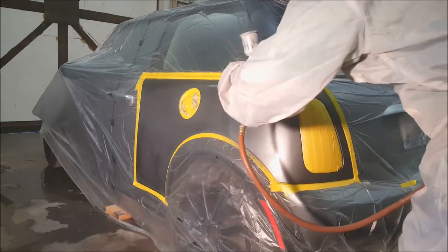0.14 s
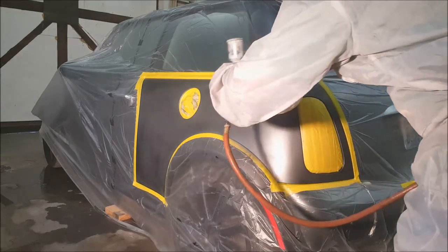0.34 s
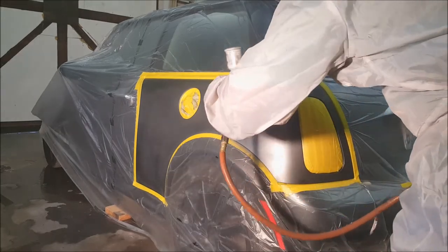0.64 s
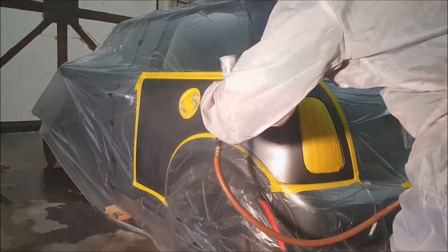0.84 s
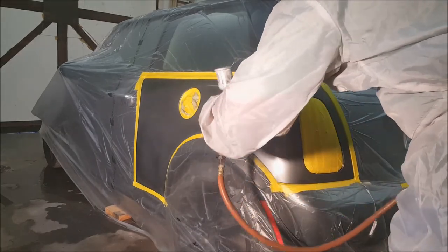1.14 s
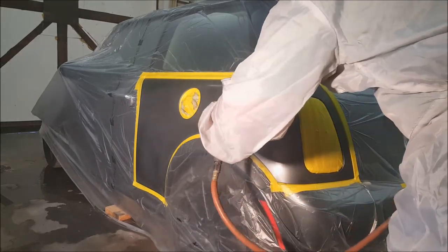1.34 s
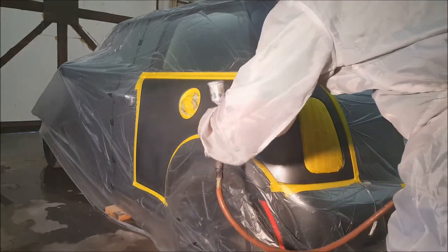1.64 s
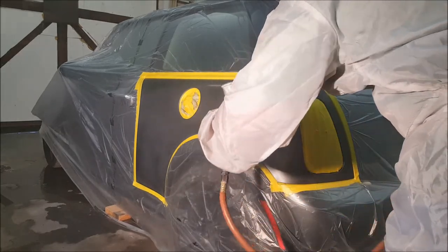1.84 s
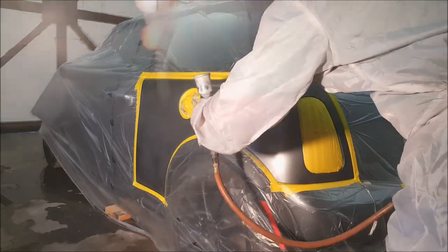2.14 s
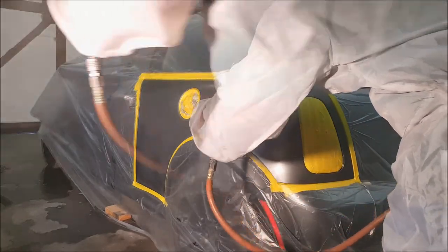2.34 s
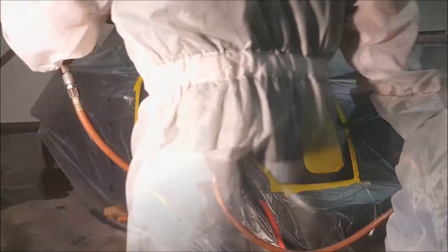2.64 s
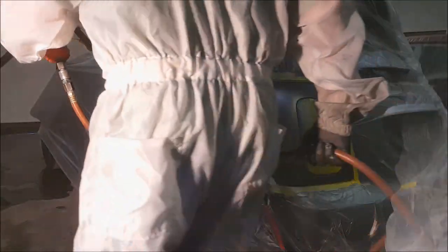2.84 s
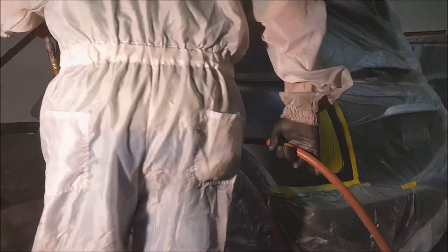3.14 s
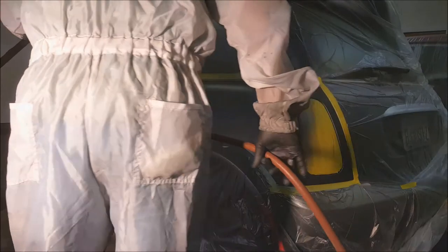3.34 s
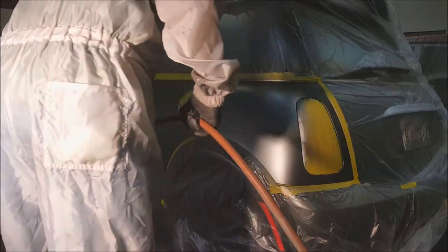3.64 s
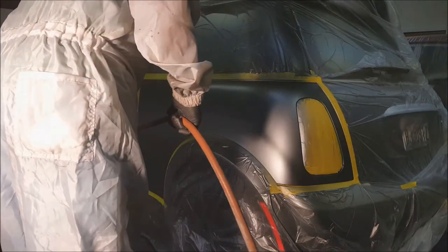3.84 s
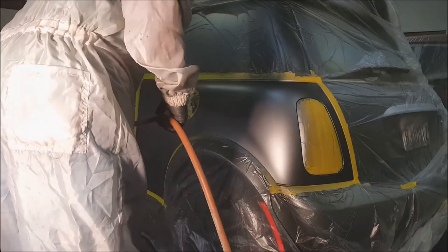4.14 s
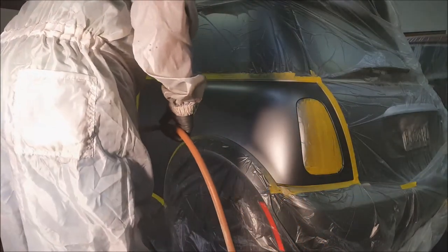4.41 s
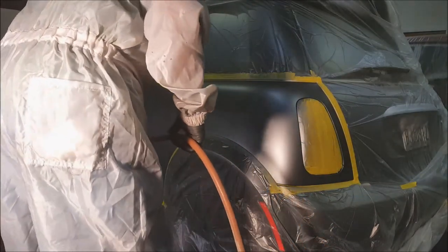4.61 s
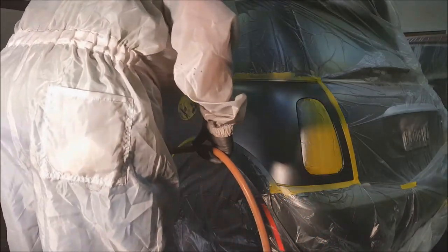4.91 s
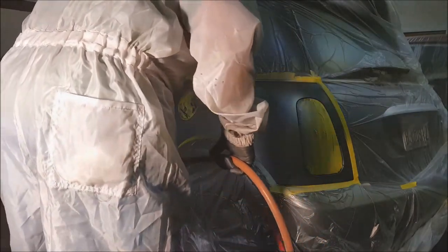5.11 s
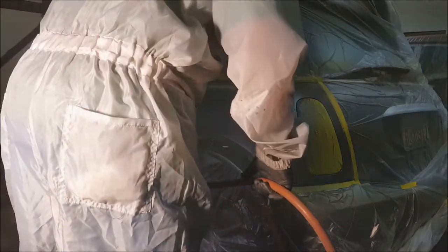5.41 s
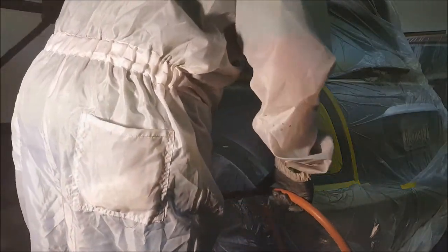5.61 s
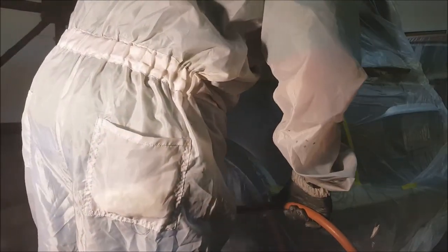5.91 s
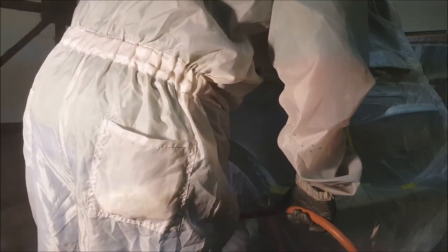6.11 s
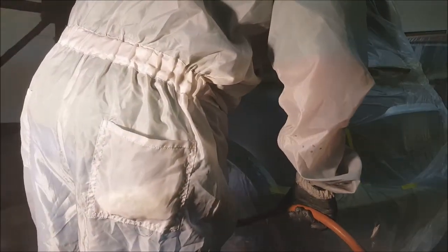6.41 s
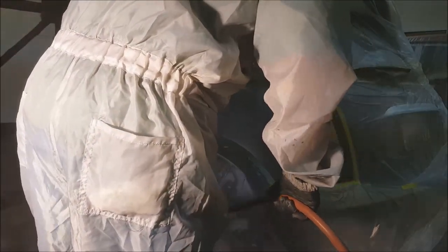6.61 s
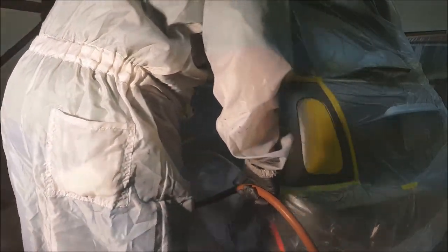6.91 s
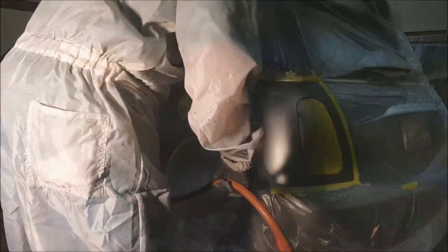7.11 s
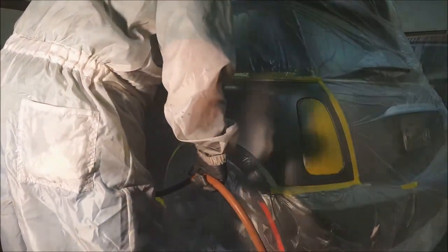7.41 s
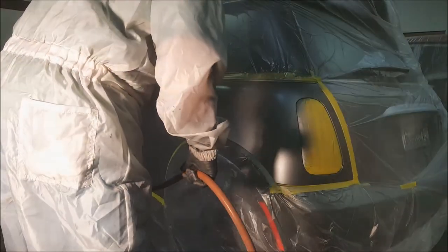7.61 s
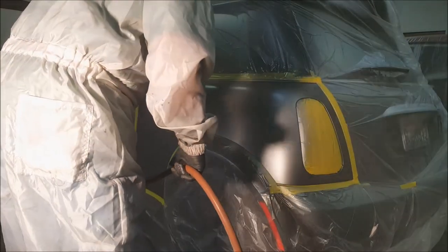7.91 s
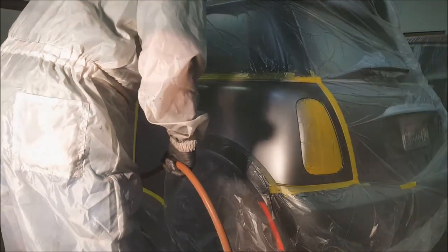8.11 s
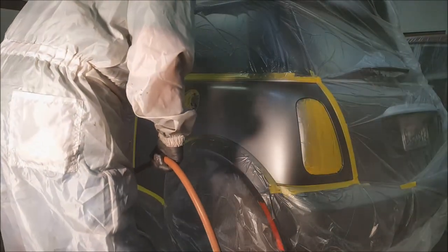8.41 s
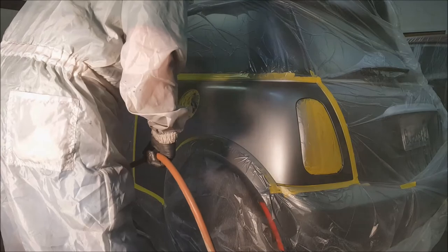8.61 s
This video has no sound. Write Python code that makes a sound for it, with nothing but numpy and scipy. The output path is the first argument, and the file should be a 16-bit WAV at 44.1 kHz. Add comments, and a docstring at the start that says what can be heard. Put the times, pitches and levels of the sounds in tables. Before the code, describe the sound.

Steady paint spraying hiss with a thin high whistle and one abrupt pause, soft bumps, and a motor starting near the end.

```python
"""In a closed workshop a spray gun hisses: its air jet sizzles, roars on the panel being sprayed and whistles
at the air cap on the nozzle. The trigger is pulled and eased; the hiss cuts off abruptly once, leaving the
quiet shop. The hose and feet bump softly, the gun's valve thumps deeply once, and late on a motor starts with a
low groan and settles into a hum with a thin whine."""
import sys
import numpy as np
from scipy import signal
from scipy.fft import rfft, irfft, next_fast_len
from scipy.io import wavfile
from scipy.ndimage import uniform_filter1d, map_coordinates

SR = 44100
rng = np.random.default_rng(int(sys.argv[2]) if len(sys.argv) > 2 else 0)


def log_audio(samples):
    """Write samples as a 16-bit WAV file to the path given in sys.argv[1]."""
    # one column per channel
    frames = np.atleast_2d(samples).T
    # limit to full scale, then quantise
    limited = np.clip(frames, -1, 1)
    pcm = np.round(limited * 32767).astype(np.int16)
    wavfile.write(sys.argv[1], SR, pcm)


N = 385875

# a hollow ring while the jet is close to the panel: time_s, band_db, note_db, note_hz
HOLLOW_RING = [(4.3, -60, -55, 925), (4.6, -42, -52, 937), (5.5, -40, -55, 903), (6.4, -43, -46, 929),
               (7.1, -40, -47, 935), (7.6, -40.5, -42.5, 933), (8.1, -36.5, -45, 940),
               (8.25, -39.5, -56, 945), (8.75, -37.5, -56, 950)]


def amp(db):
    """Turn decibels into a gain to multiply by."""
    return 10 ** (np.asarray(db) / 20)


def unit(x):
    """Scale x to an average strength (rms) of 1."""
    return x / np.sqrt(np.mean(np.abs(x) ** 2) + 1e-20)


def along(points, hz):
    """Read between (pitch_hz, value) points, with octaves evenly spaced."""
    pitches, values = np.transpose(points)
    return np.interp(np.log(hz + 1), np.log(pitches + 1), values)


def curves(rows):
    """Join rows of (time_s, values...) with straight lines: one curve per value column."""
    times, *columns = np.transpose(rows)
    return [np.interp(np.arange(N) / SR, times, column) for column in columns]


def during(rows, fade_s):
    """1 from the first row's time to the last, fading to 0 outside."""
    start, end = rows[0][0], rows[-1][0]
    return curves([(start - fade_s, 0), (start, 1), (end, 1), (end + fade_s, 0)])[0]


def humps(rows):
    """Add up smooth hills given as (time_s, height, half_width_s)."""
    t = np.arange(N) / SR
    return sum(height * np.exp(-.5 * ((t - s) / half) ** 2) for s, height, half in rows)


def wobble(rate):
    """A smooth curve through `rate` random values a second."""
    knots = rng.standard_normal(int(N * rate / SR) + 4)
    coarse = np.arange(0, N + 64, 64)
    return np.interp(np.arange(N), coarse, map_coordinates(knots, [coarse * rate / SR]))


def filtered(x, response):
    """Multiply each frequency in x by the gain response(hz)."""
    size = next_fast_len(N + SR // 4)
    return irfft(rfft(x, size) * response(np.fft.rfftfreq(size, 1 / SR)), size)[..., :N]


def rush(spectrum, patchy_db):
    """Stereo noise shaped by a spectrum, with random louder and softer patches."""
    # how alike left and right are (1 = the same): pitch_hz, likeness
    alike = [(60, 0.37), (180, 0.76), (550, 0.42), (1650, 0.17), (4970, 0.069), (15000, 0.021)]

    def mid_and_side(hz):
        """Gains for the part both sides share and the part that sets them apart."""
        turn = np.arccos(np.clip(along(alike, hz), -1, 1)) / 2
        return amp(along([(9.3, -120)] + spectrum, hz)) * [np.cos(turn), np.sin(turn)]

    grid = signal.stft(rng.standard_normal((2, N)), nperseg=512)[2]
    patches = uniform_filter1d(rng.standard_normal(grid.shape[1:]), size=8, axis=0)  # smooth in pitch
    patches = uniform_filter1d(patches, size=14, axis=1)  # and in time
    noise = signal.istft(grid * amp(patchy_db * unit(patches)), nperseg=512)[1][:, :N]
    mid, side = filtered(noise, mid_and_side)
    return np.array([mid + side, mid - side]) / np.std(mid)


def tone(hz, waver_hz, flutter_db, rate, apart):
    """An unsteady note; the walls give each side its own phase and strength, as far as `apart` says."""
    phase = 2 * np.pi * np.cumsum(hz + waver_hz * wobble(rate)) / SR
    shared = wobble(rate)
    sides = []
    for _ in "LR":
        strength = amp(flutter_db * (shared + apart * wobble(rate)))
        sides.append(strength * np.sin(phase + apart * wobble(6)))
    return np.sqrt(2) * np.array(sides)


def shop_air():
    """The quiet, even background noise of the workshop."""
    # its tone colour: pitch_hz, level_db
    spectrum = [(15, -49), (25, -17), (33, -27), (70, -10.5), (108, -17.5), (127, -4.5), (161, -12),
                (195, -5), (223, -11), (384, -11.5), (476, -10), (1040, -14.5), (8360, -15.5), (10100, -22),
                (16000, -18)]
    return amp(-55) * rush(spectrum, patchy_db=0.3)


def bumps():
    """Soft knocks of hose and feet, and one deep thump of the gun's valve: a low thud that dies quickly, with a
    puff of dull noise."""
    # each knock: start_s, level_db, pitch_hz, ring_s (time to fade by 60 dB)
    knocks = [(1.369, -39, 110, .05), (2.018, -35, 150, .05), (2.203, -21.5, 270, .023),
              (2.477, -20, 320, 0.019), (2.739, -39, 161, 0.053), (3.304, -43, 150, .04),
              (3.402, -45, 190, .04), (3.74, -46, 50, .1), (3.868, -29, 250, 0.025),
              (5.375, -37, 159, 0.15)]
    sound, t = np.zeros(N + SR), np.arange(SR // 4) / SR
    dull = signal.butter(2, [70, 500], "bp", fs=SR, output="sos")
    attack = 1 - np.exp(-t / 0.0016)
    for start_s, level_db, pitch_hz, ring_s in knocks:
        puff = signal.sosfilt(dull, rng.standard_normal(len(t)))
        thud = np.sin(2 * np.pi * pitch_hz * t) + 0.36 * unit(puff)
        sound[round(start_s * SR):][:len(t)] += amp(level_db - 60 * t / ring_s) * attack * thud
    return sound[:N]


def motor():
    """A motor groans as it picks up load, then hums at twice the mains frequency and whines."""
    # the motor starting up: time_s, groan_db, hum_db, rumble_db
    levels = [(7.1, -79, -76, -66), (7.22, -56, -56, -46), (7.28, -42.5, -46, -42),
              (7.374, -37.5, -41, -45), (7.47, -43, -46, -45), (7.52, -54, -48, -41.5),
              (7.63, -60, -47, -48), (7.68, -57, -40.5, -46), (7.93, -56, -44.5, -46),
              (8.12, -51, -51, -43), (8.27, -54, -47, -47.5), (8.75, -49, -49, -44.5)]
    # the rumble's tone colour: pitch_hz, level_db
    rumble_spectrum = [(15, -48), (25, -13), (113, -5), (146, -5), (298, -11), (380, -5.5), (450, -23),
                       (580, -41), (990, -120)]
    # weaker notes in the whine: pitch_hz, level_db (relative to its main note)
    side_notes = [(484.5, -8), (1066, -8)]
    groan_hz, hum_hz, whine_hz = 67, 119, 695
    groan_db, hum_db, rumble_db = curves(levels)
    sound = amp(groan_db) * tone(groan_hz, waver_hz=3.0, flutter_db=1.8, rate=10, apart=.2)
    sound += amp(hum_db) * tone(hum_hz, waver_hz=3.26, flutter_db=1.0, rate=20, apart=0.21)
    sound += amp(rumble_db) * rush(rumble_spectrum, patchy_db=0.5)
    up_to_speed = curves([(7.9, 0.12), (8.15, 0.95)])[0]
    whine_gain = up_to_speed * amp(-43 + humps([(8.376, -15, .02)]))  # the whine drops out once
    for hz, db in [(whine_hz, 0)] + side_notes:
        sound += whine_gain * amp(db) * tone(hz, waver_hz=2.87, flutter_db=3.4, rate=14, apart=0.37)
    return during(levels, fade_s=0.046) * sound


def low_flutter():
    """A low, fluttering rush of air under the hiss."""
    # how loud it is: time_s, level_db
    levels = [(0, -61), (0.4, -52.5), (0.62, -61), (1.4, -53), (1.74, -55.5), (1.82, -49.5), (2.35, -49),
              (2.53, -45), (2.65, -50), (3.235, -52), (3.85, -47.5), (4.5, -55), (6.2, -51.5), (7, -53),
              (8.75, -52.5)]
    # its tone colour: pitch_hz, level_db
    spectrum = [(25, -16), (60, -14), (100, -9), (150, -3), (280, -2), (420, -1.5), (600, -8.5),
                (1000, -120)]
    return amp(curves(levels)[0] + 2.4 * wobble(7)) * rush(spectrum, patchy_db=1.0)


def hollow_ring():
    """The roar rings hollow: a band of noise with a wavering note inside it."""
    band_db, note_db, note_hz = curves(HOLLOW_RING)
    centre_hz, width_hz = 957, 225
    shape = [(-3, -40), (-1, -6), (0, 0), (1, -8), (3, -40)]  # widths_from_centre, level_db
    spectrum = [(centre_hz + widths * width_hz, db) for widths, db in shape]
    band = amp(band_db) * rush(spectrum, patchy_db=1.15)
    note = amp(note_db) * tone(note_hz, waver_hz=6.94, flutter_db=3.0, rate=18, apart=0.5)
    return band + note


def panel_roar(body_db, closeness):
    """The jet roars where it hits the panel, louder when it is close."""
    # the roar's tone colour: pitch_hz, level_db
    spectrum = [(250, -23.5), (450, -8), (680, -2.5), (960, -1.5), (1300, -3.5), (1700, -10.5),
                (2800, -120)]
    return amp(body_db - 10 + 4 * closeness + 0.6 * wobble(7)) * rush(spectrum, patchy_db=1.0)


def cap_whistle(hiss_db):
    """Air crossing the cap's edge whistles at each firm pull; the note steadies as its pitch climbs."""
    # each pull: start_s, end_s, settled_hz, starts_lower_hz, climb_s, level_db (relative to hiss), waver_hz
    pulls = [(1.77, 2.29, 5520, 70, .25, -15, 45), (2.335, 2.5, 5500, 350, .06, -12, 40),
             (3.74, 3.98, 5220, 90, .06, -17, 50), (4.04, 8.8, 5550, 400, .52, -11.5, 10)]
    # moments when the whistle catches hard: time_s, boost_db, half_width_s
    catches = [(2.15, 10, .045), (2.36, 8, .025), (2.46, 5, .02), (3.83, 3, .03), (4.65, 4, .03),
               (5.73, 6, .03), (5.92, 5, .03), (6.12, 5, .04), (8.06, 4, .1)]
    t, sound = np.arange(N) / SR, 0
    flare_db = 1.8 * wobble(34) + humps(catches)  # it keeps catching and slipping
    sag_hz = 28 * np.maximum(t - 7.4, 0)  # the pitch sinks once the motor runs
    for start_s, end_s, settled_hz, starts_lower_hz, climb_s, level_db, waver_hz in pulls:
        to_climb_hz = starts_lower_hz * np.exp(-np.maximum(t - start_s, 0) / climb_s)
        pitch_hz = settled_hz - to_climb_hz - sag_hz
        note = tone(pitch_hz, waver_hz + .08 * to_climb_hz, flutter_db=2.5, rate=70, apart=1.0)
        gain = amp(hiss_db + level_db - .004 * to_climb_hz + flare_db)  # weaker until it has climbed
        sound += during([(start_s,), (end_s,)], fade_s=0.018) * gain * note
    return sound


def air_jet(hiss_db, sizzle_db, body_db):
    """Churning air leaves the cap as a bright hiss, a very high sizzle and a lower, fuller body."""
    # the tone colours of the three: pitch_hz, level_db
    hiss_spectrum = [(1650, -14), (2800, -9), (4480, -3), (5200, -3), (5360, -3), (6320, -1.5), (8140, 2),
                     (8610, 1.5), (9600, -12), (12500, -20), (21100, -120)]
    sizzle_spectrum = [(5470, -23), (9300, -0.5), (10300, -1.5), (11600, 2.5), (14900, 4), (15900, -3.5)]
    body_spectrum = [(650, -31), (1100, -8.5), (1340, -4.5), (1800, -0.5), (3200, -1), (4160, -6),
                     (7040, -120)]
    # short spurts of extra hiss: time_s, boost_db
    spurts = [(5.73, 0.5), (6.57, 3.5)]
    spurt_db = humps([(s, db, 0.017) for s, db in spurts])
    surge_db = 0.2 * wobble(9) + 0.2 * wobble(22)  # the air pressure pulses a little, moving all three
    hiss = rush(hiss_spectrum, patchy_db=0.89)
    sizzle = amp(sizzle_db + 0.64 * wobble(5.3)) * rush(sizzle_spectrum, patchy_db=1.2)
    body = amp(body_db + surge_db + 0.16 * wobble(3.9)) * rush(body_spectrum, patchy_db=0.67)
    return amp(hiss_db + spurt_db + surge_db) * (hiss + sizzle) + body


def sudden_gap():
    """The hiss cuts off abruptly, fading in an instant, and comes back sharply half a second later."""
    stop_s, fade_s, back_s, rise_s = 3.257, .008, 3.733, 0.0052
    t = np.arange(N) / SR
    fade = amp(-16) * np.exp(-np.maximum(t - stop_s, 0) / fade_s) * (t < back_s)
    rise = np.exp(np.minimum(t - back_s, 0) / rise_s)
    return np.where(t < stop_s, 1, fade + rise)


def spray_gun():
    """All the sounds of the rushing air, broken by one sudden gap and placed between left and right."""
    # the jet's strength: time_s, hiss_db, sizzle_db (relative to hiss), body_db
    levels = [(0, -29.3, -1.5, -40), (0.5, -30, -1, -39), (1.35, -29.5, -1, -38.5),
              (1.74, -29.5, -2, -39.5), (1.765, -24, -3.5, -34), (1.96, -24, -1.5, -29.5),
              (2.08, -22, -2.5, -31.5), (2.2, -25, -2, -33.5), (2.29, -28.5, -4, -38),
              (2.33, -29, -4, -34.5), (2.35, -23.5, -2, -35), (2.43, -23.5, -4, -31.5),
              (2.56, -26.5, -2.5, -38.5), (2.86, -30, -2.5, -37), (2.93, -28.5, -2, -34.5),
              (3.0, -29, 1.5, -38), (3.235, -28, -1.5, -40), (3.76, -26, 1.5, -34),
              (3.86, -22.5, -3, -36.5), (3.9, -27.5, -5.5, -39), (3.95, -30, -12, -43),
              (4.0, -36, -14, -42), (4.02, -28, 3, -36), (4.045, -25, 1.5, -35.5), (4.26, -23, -2, -36),
              (4.4, -26, -2, -32.5), (4.65, -27.6, -2.3, -34), (5.1, -28, -1.5, -34.5),
              (5.35, -28.5, -3, -34), (5.95, -28.5, -2.5, -34), (6.12, -28, -1, -34),
              (6.5, -26, -3.5, -34.5), (7, -28, -3, -33), (7.7, -26.7, -2.5, -33), (7.86, -28, -3, -34),
              (8.25, -28.5, -2.5, -33), (8.75, -27.5, -1.5, -35)]
    # the wrist swings the nozzle away and back: time_s, sizzle_dip_db
    swings = [(0.45, 4.5), (0.72, 3), (0.99, 2), (1.22, 2), (1.49, 3)]
    # where the gun is: time_s, left_minus_right_db
    position = [(0, -1), (2.25, -0.2), (3, -1.3), (3.75, 0), (5.25, -1), (6.75, -1.5), (8.25, -1)]
    hiss_db, sizzle_db, body_db = curves(levels)
    dip_db = humps([(s, db, 0.043) for s, db in swings])
    body_db += 0.53 * dip_db  # as the sizzle dips the body comes up, and the roar even more
    closeness = during(HOLLOW_RING, fade_s=0.11)
    air = air_jet(hiss_db, sizzle_db - dip_db, body_db)
    air += panel_roar(body_db + 0.31 * dip_db, closeness)
    air += low_flutter()
    air += closeness * hollow_ring()
    air += cap_whistle(hiss_db)
    return sudden_gap() * air * amp(.5 * curves(position)[0] * [[1], [-1]])


def scene():
    """The gun, the motor and the bumps over the quiet of the shop."""
    return spray_gun() + motor() + bumps() + shop_air()


def record(dry):
    """Two slightly unequal microphones, with a tiny constant offset and the highest treble cut off."""
    # how the microphones differ: pitch_hz, left_minus_right_db
    balance = [(60, 1), (160, 2), (450, 2), (1220, 3.5), (2010, 5), (3330, 1.5), (5500, 1.5), (8500, 4),
               (10500, 1.5), (15000, 3)]
    offset, top_hz = -.0006, 15930
    return filtered(dry + offset, lambda hz: amp(.5 * along(balance, hz) * [[1], [-1]]) * (hz < top_hz))


dry = scene()
out = record(dry)
log_audio(out)
```